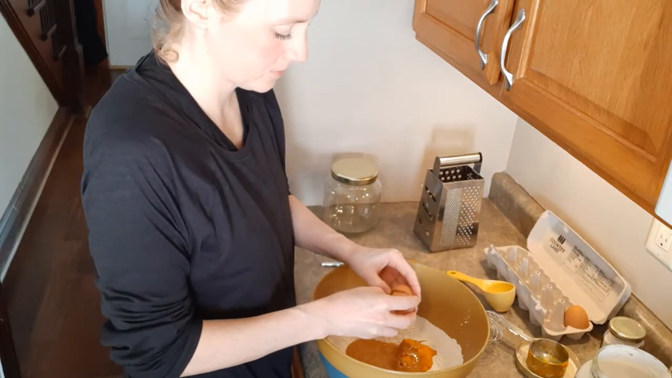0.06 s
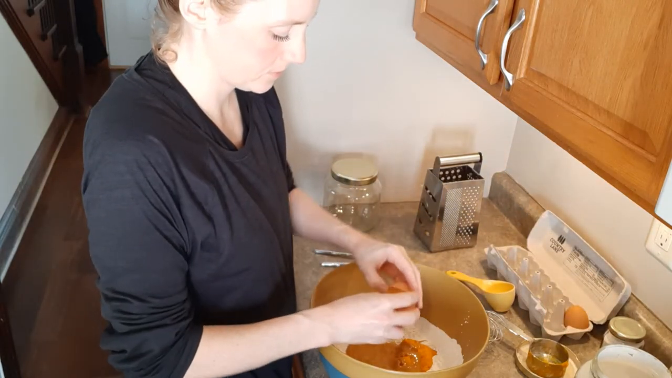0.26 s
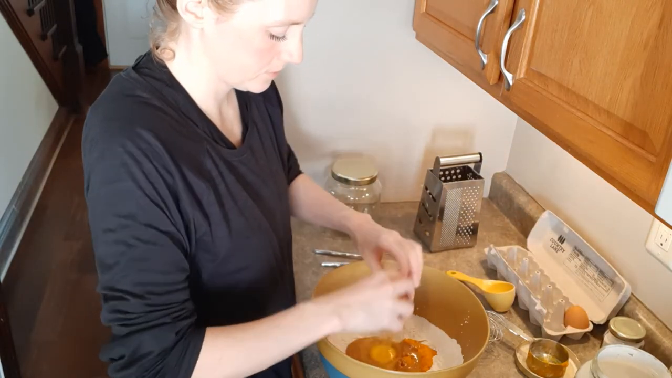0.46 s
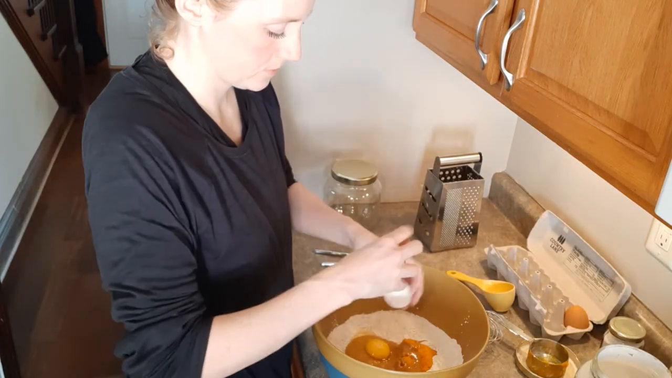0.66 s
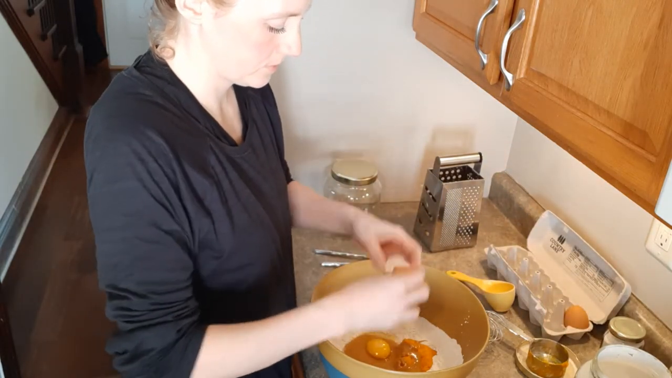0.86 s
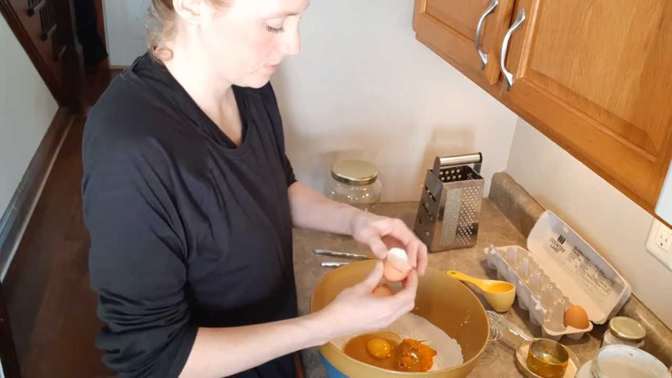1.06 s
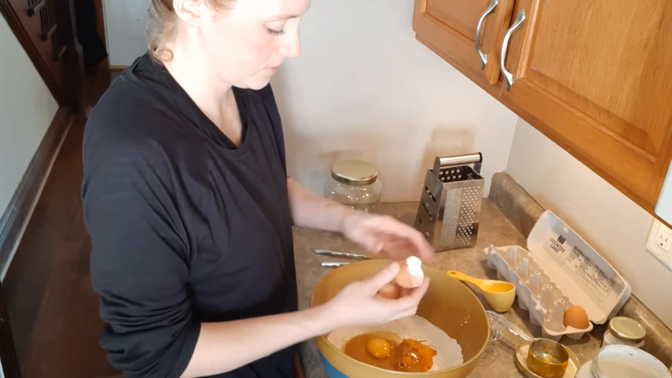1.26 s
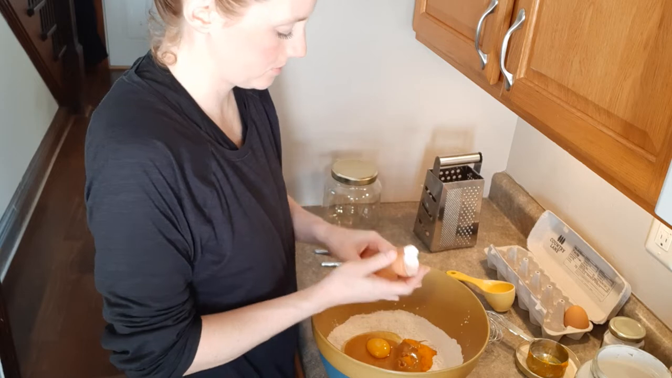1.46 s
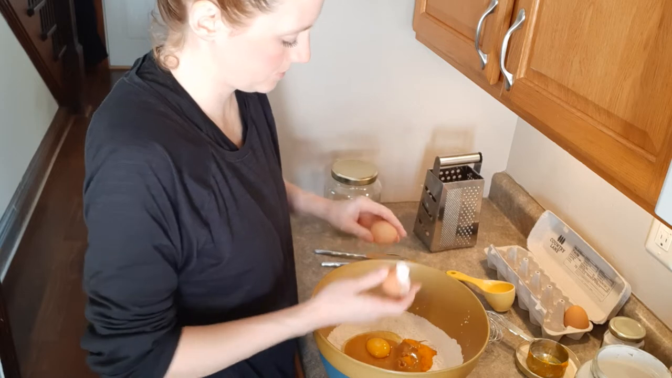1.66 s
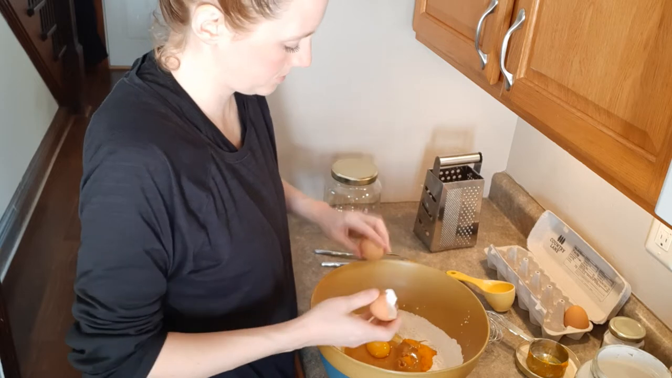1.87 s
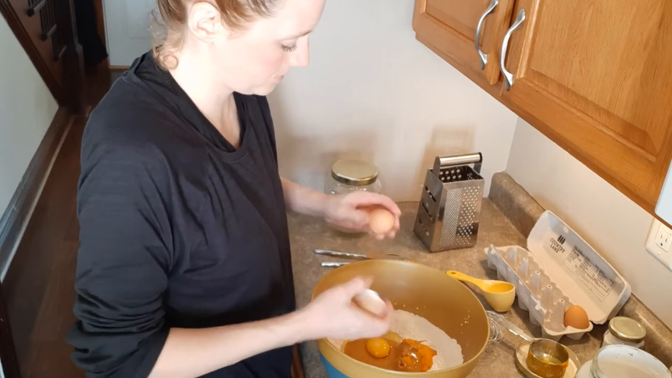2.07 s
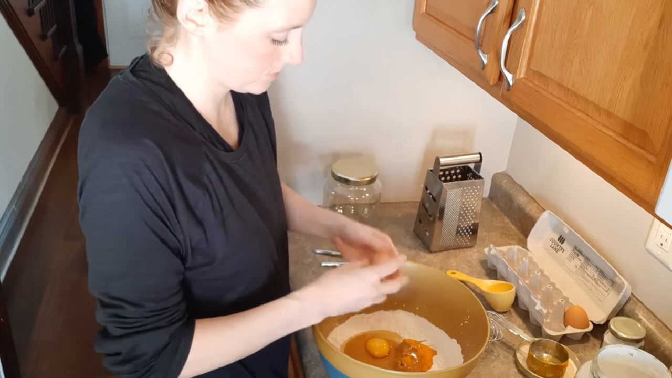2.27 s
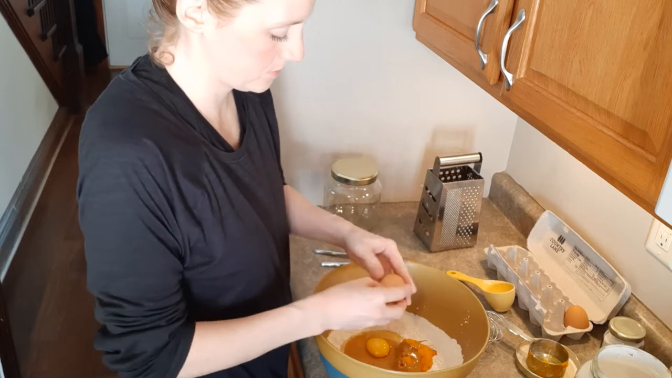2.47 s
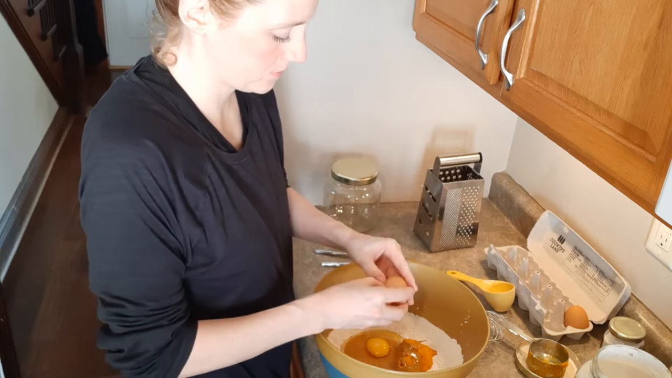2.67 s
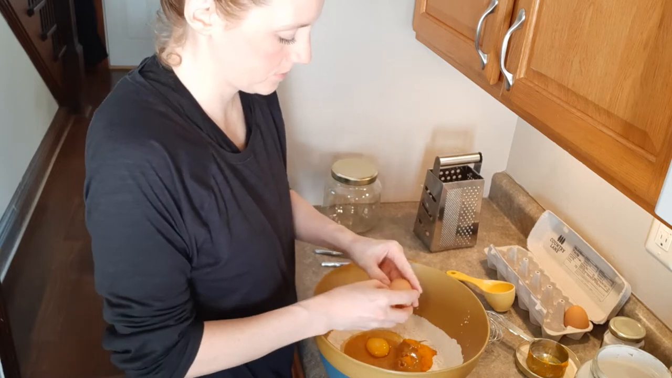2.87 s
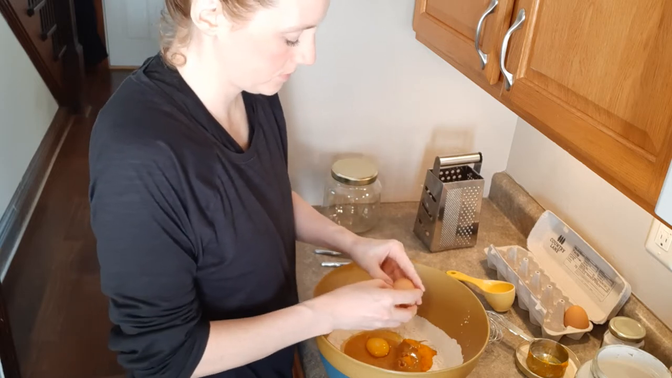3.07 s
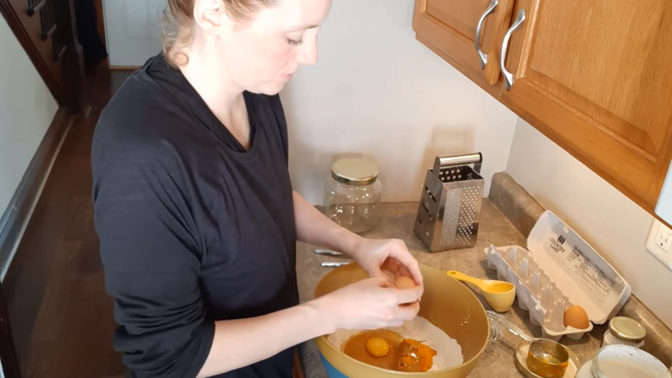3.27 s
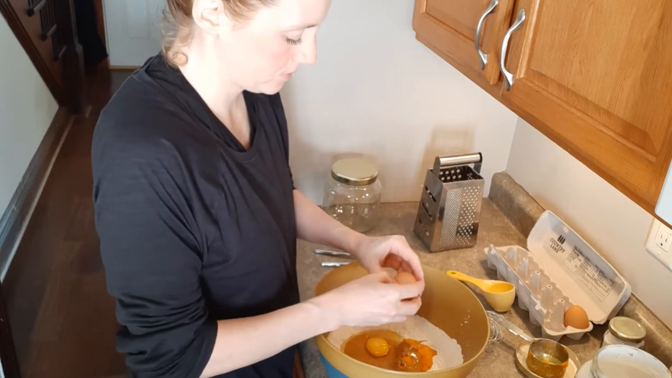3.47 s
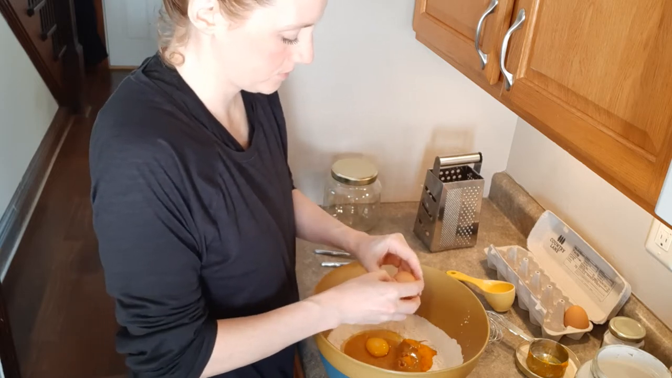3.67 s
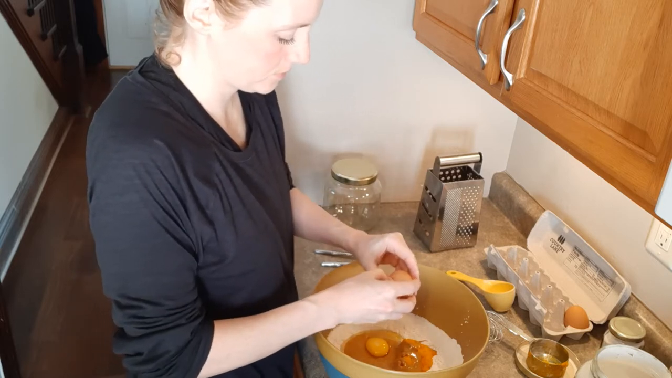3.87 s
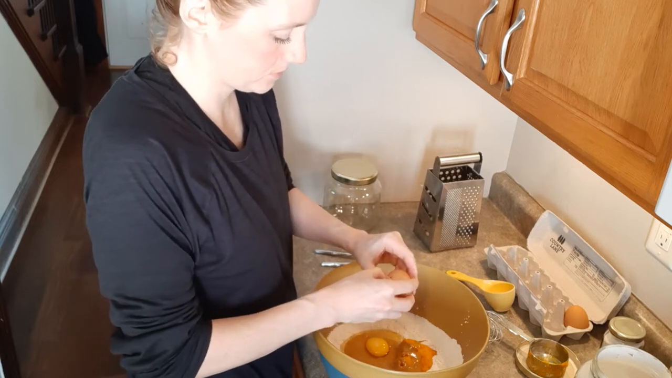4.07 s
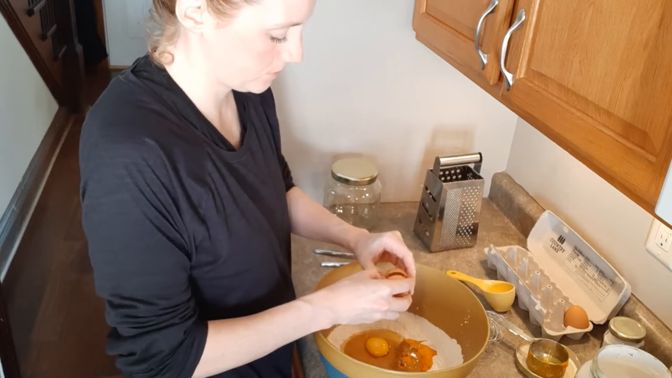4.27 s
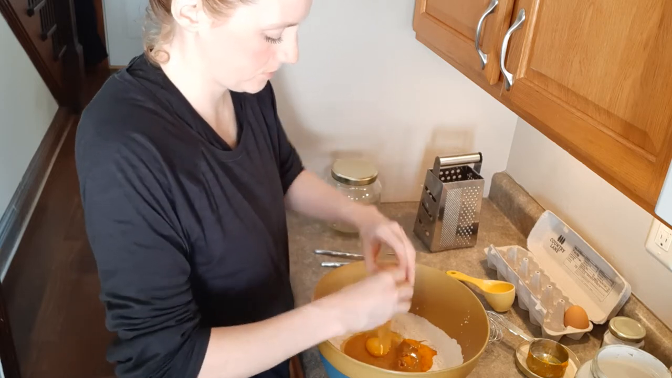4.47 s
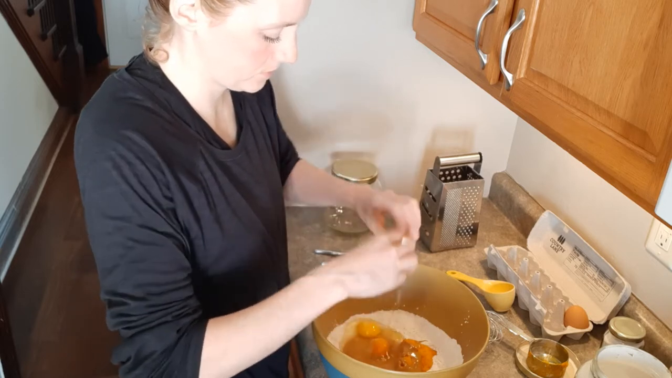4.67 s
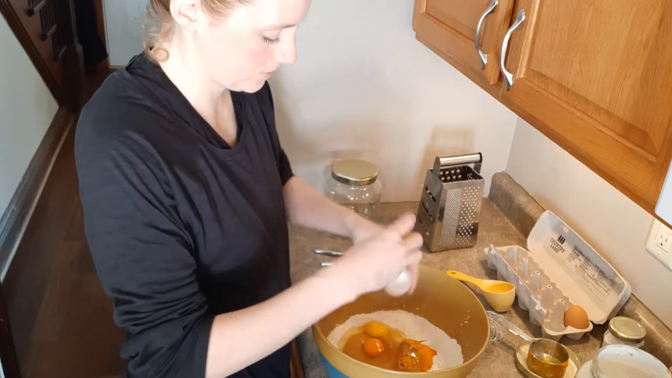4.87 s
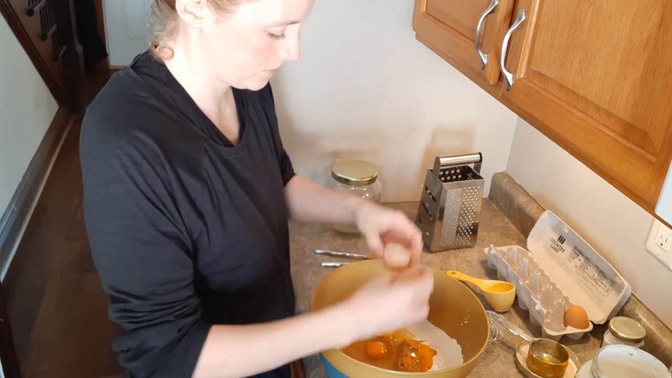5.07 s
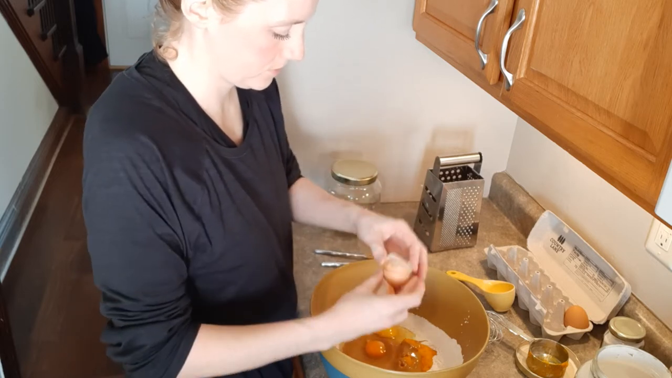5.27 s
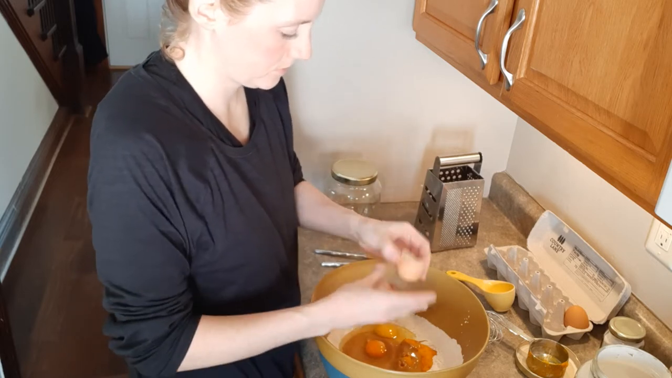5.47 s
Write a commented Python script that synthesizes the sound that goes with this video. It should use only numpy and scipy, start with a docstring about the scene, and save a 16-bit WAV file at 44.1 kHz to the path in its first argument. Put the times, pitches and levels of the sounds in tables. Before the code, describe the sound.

Stereo pickup near a mixing bowl on a counter: light dry shell ticks and a small crunch, one sharp, dominant knock on the rim with short bowl resonance and a dull boom. Quiet picking clicks continue until the shell splits with wet hollow pops, then halves are pressed together in a bright crackle. Short lively room reflections, low steady appliance rumble with faint hiss behind.

```python
"""Eggshells crack and crush over a mixing bowl: runs of tiny filtered clicks, brighter or duller piece by piece.
Thumbs pull one shell apart; the next egg is knocked on the rim, pried open and emptied, its halves pushed together.
Air pockets in the wet shell pop as short ringing tones, and the draining white crackles.
The bowl rings in decaying modes and the counter thuds with low booms and a noise bump.
A small hard room answers, over shaped fan noise and wavering motor tones from an appliance."""
import sys
import numpy as np
from scipy import signal
from scipy.fft import rfft, irfft
from scipy.io import wavfile

SR = 44100
rng = np.random.default_rng(int(sys.argv[2]) if len(sys.argv) > 2 else 0)


def unload_wav(signal):
    """Save mono or channel-first audio to the path in sys.argv[1] as 16-bit WAV at rate SR, clipped to [-1, 1]."""
    wavfile.write(
        sys.argv[1],
        SR,
        np.round(np.clip(np.atleast_2d(signal).T, -1, 1) * 32767).astype(np.int16),
    )


N = 243431  # samples

# Single shell cracks: (t/s, level/dB, length of the run/s, lowest f of the flexing piece/Hz, treble/dB)
SHELL_CRACKS = [(.037, -44.5, 0.0051, 4470, -20), (.082, -29, 0.0076, 3330, -3.5),
                (0.197, -42.5, .0012, 4000, 3), (0.4231, -24.5, .0012, 3260, 14),
                (0.4252, -31.5, .003, 3340, -11), (1.9191, -9, 0.0061, 840, 1.5),
                (2.633, -44, 0.014, 2600, 4), (2.673, -38, 0.0042, 2580, -6),
                (2.92, -31.5, 0.0025, 4200, -4), (2.9624, -24.5, .008, 1960, 2),
                (3.0917, -28, 0.0036, 1640, 1.5), (3.7182, -28.5, 0.0046, 3640, 2),
                (4.222, -19.5, 0.0064, 1010, 16), (4.227, -14, 0.0017, 3120, 1.5),
                (4.426, -42, 0.0079, 1130, -3), (4.537, -49, 0.0064, 3960, -12),
                (4.57, -43.5, 0.014, 4700, -22), (4.675, -30.5, 0.0013, 9600, 26.5),
                (5.236, -35, 0.0091, 2500, 1), (5.2861, -22.5, 0.0063, 2000, 21)]
SNAPS_PER_S, SNAP_SPREAD_DB, FIRST_SNAP_DB = 1900, 5.5, 15  # jerks of a running crack


def cracks():
    """A crack runs through the shell as a rapid train of snaps, led by a strong one."""
    out = np.zeros(N)
    for s, db, length, low_hz, treble_db in SHELL_CRACKS:
        run = snaps(length, SNAPS_PER_S, SNAP_SPREAD_DB, FIRST_SNAP_DB)
        add(out, s, at_level(piece(run, low_hz, treble_db), db))
    return out


# Shell being crushed: (t/s, level/dB, swell/s, die-away/s, lowest f/Hz, starting treble/dB,
# ring level of the hollow/dB, first pitch f of the hollow/Hz)
SHELL_CRUSHES = [(0.261, -38.5, .002, 0.039, 1270, 7, -39.5, 2370),
                 (.776, -39, .002, 0.025, 2100, 9, -51.5, 2720),
                 (1.071, -17.5, 0.04, .017, 1810, 12.5, -25, 2240),
                 (1.927, -17.5, 0.0043, 0.049, 780, -5, -33, 1420),
                 (4.235, -30, .002, 0.071, 1190, -3.5, -39, 1690),
                 (5.051, -36.5, .001, 0.034, 1190, 5, -32.5, 2230),
                 (5.292, -19, 0.0077, 0.03, 1700, 20, -29.5, 2670)]
CRUSH_JERKS_PER_S, CRUSH_SPREAD_DB = 1200, 6  # density of snaps and how much their sizes differ
DULLING_DB_PER_S = 125.5  # a crush loses treble as egg white wets the pieces
HOLLOW_SINK, HOLLOW_SINK_S = 0.43, 0.093  # fall of the hollow's pitch (log units) and its time constant


def crush_snaps():
    """Squeezed shell breaks in a swelling and fading crowd of snaps that grows duller."""
    out, t = np.zeros(N), np.arange(SR // 4) / SR
    for s, db, swell, die_away, low_hz, treble_db, _, _ in SHELL_CRUSHES:
        squeeze = pressure(t, swell, die_away, start=0.22)
        run = jerks(t, CRUSH_JERKS_PER_S, CRUSH_SPREAD_DB) * squeeze
        treble_over_time = treble_db - DULLING_DB_PER_S * t
        add(out, s, at_level(piece(run, low_hz, treble_over_time), db))
    return out


def crushed_hollows():
    """The air in a crushed half rings on at a sinking pitch."""
    out, t = np.zeros(N), np.arange(SR // 4) / SR
    for s, _, swell, die_away, _, _, db, first_hz in SHELL_CRUSHES:
        squeeze = pressure(t, swell, 1.6 * die_away, start=0.56)
        run = jerks(t, per_s=900, spread_db=2.5) * squeeze
        hz = first_hz * np.exp(-HOLLOW_SINK * (1 - np.exp(-t / HOLLOW_SINK_S)))
        add(out, s, at_level(pocket(run, hz, cycles=45, scatter=0.12), db))
    return out


# Air pockets popping in the wet shell: (t/s, level/dB, f/Hz, time it keeps being shaken/s)
AIR_POPS = [(.082, -34, 4100, .0023), (.262, -32.5, 1400, 0.0018), (.262, -38, 2110, .004),
            (.263, -39.5, 3740, 0.0063), (.423, -30.5, 3700, 0.00096), (0.517, -35.5, 2050, 0.012),
            (3.719, -43, 2140, 0.0076), (4.224, -24, 1234, 0.015), (4.226, -21.5, 3255, 0.0025),
            (4.227, -20, 4500, 0.0088), (4.573, -39, 6220, 0.0066), (4.644, -43.5, 3140, 0.034),
            (4.702, -40, 2740, 0.0058), (5.053, -35.5, 3160, .045), (5.16, -45.5, 3440, 0.0062),
            (5.2867, -27.5, 2494, 0.0068), (5.2866, -29, 3420, 0.0043), (5.32, -31.5, 5870, 0.01),
            (5.322, -30, 1940, 0.013), (5.344, -31, 1480, 0.015), (5.345, -30.5, 3740, 0.0053),
            (5.398, -36, 2170, 0.014)]
POP_TICK_DB, POP_TICK_TREBLE_DB = -11, -21  # bursting film: level against its pop, and its treble
POP_CYCLES, POP_LEAK = 44, 0.33  # cycles to -60 dB at 2 kHz; smaller pockets leak more and ring fewer


def film_ticks():
    """The film over each air pocket bursts with a single dull tick."""
    out = np.zeros(N)
    for s, db, hz, _ in AIR_POPS:
        tick = signal.unit_impulse(SR // 4)
        add(out, s, at_level(piece(tick, hz, POP_TICK_TREBLE_DB), db + POP_TICK_DB))
    return out


def pops():
    """A small pocket of air is shaken into a short, slightly scattered ring."""
    out = np.zeros(N)
    for s, db, hz, length in AIR_POPS:
        run = snaps(length, per_s=870, spread_db=7.0, first_db=18)
        cycles = POP_CYCLES * (2000 / hz) ** POP_LEAK
        add(out, s, at_level(pocket(run, hz, cycles, scatter=1.57 / cycles), db))
    return out


# Fingers sliding over a shell: (t/s, level/dB, length/s)
FINGER_RUBS = [(0, -49, 0.023), (1.395, -45.5, 0.1), (2.373, -51, 0.098), (3.39, -49, 0.058),
               (4.182, -48.5, .02), (4.982, -50.5, 0.066)]
RUB_LOW_HZ, RUB_TREBLE_DB = 1730, -4.5


def rubs():
    """Sliding fingers catch and slip in a dense, fine patter with a soft start."""
    out = np.zeros(N)
    for s, db, length in FINGER_RUBS:
        run = snaps(length, per_s=3900, spread_db=5.0, first_db=-14)
        add(out, s, at_level(piece(run, RUB_LOW_HZ, RUB_TREBLE_DB), db))
    return out


# Tone colour of shell snaps: (f/Hz, level/dB)
SHELL_COLOUR = [(700, -3), (1500, 7), (2100, 2), (3000, -4.5), (4200, -1), (5500, -1), (7500, -3),
                (11000, -4.5), (16000, -5.5)]


def shell():
    """Cracks, crushes, film ticks and rubs all take on the colour of thin shell."""
    return colour(cracks() + crush_snaps() + film_ticks() + rubs(), SHELL_COLOUR)[0]


DRAIN_START_S, DRAIN_DIE_AWAY_S, DRAIN_DB, DRAIN_HZ, STRANDS_PER_S = 4.33, 0.08, -44.5, 2100, 59


def draining():
    """The opened egg drains and strands of white part with a fine wet crackle."""
    out, t = np.zeros(N), np.arange(SR // 4) / SR
    strands = jerks(t, STRANDS_PER_S, spread_db=7.0) * np.exp(-t / DRAIN_DIE_AWAY_S)
    add(out, DRAIN_START_S, at_level(pocket(strands, DRAIN_HZ, cycles=10, scatter=.35), DRAIN_DB))
    return out


def hollows():
    """Small wet cavities radiate pops, hollow rings and drips of crackle, with little bass."""
    wet = pops() + crushed_hollows() + draining()
    return signal.sosfilt(signal.butter(2, 750, "high", fs=SR, output="sos"), wet)


# The egg meets the rim and sinks onto it: (t/s, level/dB, contact time/s)
RIM_KNOCKS = [(1.9189, -1.5, 0.0009), (1.943, 6, 0.00049), (1.961, -37.5, 0.0014)]
# Ringing modes of the bowl: (f/Hz, relative level/dB, time to fall 60 dB/s)
BOWL_MODES = [(251, -25.5, 0.2), (426, -32.5, 0.13), (841.7, -30, .34), (1389, -25, .33),
              (1540, -32.5, 0.19), (1714, -29, 0.11), (2057.7, -20.5, 0.28), (2380, -32, 0.13),
              (2844, -38, 0.28), (3752, -39.5, .33), (4640, -34, .29), (4720, -38, .27), (5010, -40.5, .31),
              (5766, -36.5, .3), (6270, -30, .22), (7300, -28, .22), (7000, -31.5, 0.2)]


def bowl():
    """Each push on the rim feeds the ringing of every mode; a longer contact softens the high ones."""
    out, t = np.zeros(N), np.arange(SR) / SR
    first = RIM_KNOCKS[0][0]
    for hz, mode_db, t60 in BOWL_MODES:
        swing = 0
        for s, db, contact in RIM_KNOCKS:
            age = t - (s - first)
            softness = 1 / np.sqrt(1 + (hz * contact / 2) ** 2)
            fading = from_db(db + mode_db - 60 * np.abs(age) / t60)
            swing = swing + softness * (age >= 0) * fading
        add(out, first, swing * np.sin(2 * np.pi * hz * t))
    return out


# Bowl rocking on the counter: (t/s, level/dB, f/Hz, time to fall 60 dB/s)
COUNTER_THUDS = [(1.936, -24.5, 170, 0.21), (1.94, -25.5, 106.6, 0.63), (1.94, -22.5, 79, 0.43),
                 (1.946, -19, 57.4, 0.67), (2.015, -20.5, 62.5, 0.14)]


def counter():
    """The heavy bowl rocks and the worktop booms in a few low modes."""
    out, t = np.zeros(N), np.arange(SR) / SR
    for s, db, hz, t60 in COUNTER_THUDS:
        add(out, s, from_db(db) * ring(hz, t60, t) * (1 - np.exp(-t / 0.00084)))
    # the worktop's many higher modes blur into a dull bump
    mid_band = signal.butter(2, [170, 900], "band", fs=SR, output="sos")
    bump = signal.sosfilt(mid_band, rng.standard_normal(len(t)))
    bump = bump * from_db(-60 * t / 0.32) * (1 - np.exp(-t / 0.019))
    add(out, RIM_KNOCKS[0][0] + .007, at_level(bump, db=-16.5))
    return out


# Room decay: (f/Hz, time to fall 60 dB/s)
ROOM_DECAY = [(100, 0.7), (700, 0.43), (2000, 0.38), (5000, 0.35), (8000, 0.26), (14000, 0.28)]
# Tone colour of the room tail: (f/Hz, relative level/dB)
ROOM_TONE = [(100, -8), (700, -4.5), (2000, 0.5), (5000, 1), (8000, 4), (15000, -1)]


def kitchen():
    """Stereo echo pattern: sparse early echoes and a dense tail that dies sooner in the treble."""
    t = np.arange(int(.7 * SR)) / SR
    hz = np.fft.rfftfreq(len(t), 1 / SR)
    white, tail = rfft(rng.standard_normal((2, len(t)))), 0
    edges = np.geomspace(40, SR / 2, num=19)
    for low, high in zip(edges, edges[1:]):
        centre = np.sqrt(low * high)
        band = irfft(white * ((hz >= low) & (hz < high)), len(t))
        fall_db = -60 * t / at_hz(ROOM_DECAY, centre)
        tail = tail + band * from_db(at_hz(ROOM_TONE, centre) + fall_db)
    tail = unit(tail * (1 - np.exp(-t / 0.00028)))
    hits = rng.random((2, len(t))) < 2500 / SR
    near = rng.standard_normal((2, len(t))) * hits * np.exp(-t / 0.0026) * (t > .0007)
    return unit(tail + 0.83 * unit(near))


def heard(x, echoes, room_db, left_db):
    """The direct sound reaches the right port two samples early; the room follows."""
    direct = np.array([from_db(left_db) * np.roll(x, 2), x])
    return direct + from_db(room_db) * signal.fftconvolve(x[None], echoes, axes=1)[:, :N]


# Fan rumble and hiss: (f/Hz, relative level/dB per Hz)
FAN_SPECTRUM = [(15, -59.5), (25, -50.5), (48, -2.5), (217, -10.5), (249, -5), (354, -13), (384, -16.5),
                (416, -11), (516, -17.5), (840, -23), (962, -25), (1560, -31), (1790, -43), (7510, -50),
                (16000, -39)]
# Likeness of the fan noise on both sides: (f/Hz, left-right correlation)
FAN_LIKENESS = [(60, 1), (130, 0.85), (250, 0.92), (500, .55), (1000, 0.05), (3000, 0.059), (15000, 0.1)]
FAN_DB = -43  # rms


def fan():
    """Steady air noise, alike on both sides in the bass and wide in the treble."""
    hz = np.fft.rfftfreq(N, 1 / SR)
    alike = np.clip(at_hz(FAN_LIKENESS, hz), 0, 1)
    mid, side = rfft(rng.standard_normal((2, N))) * from_db(at_hz(FAN_SPECTRUM, hz))
    spectrum = np.sqrt(1 + alike) * mid + np.sqrt(1 - alike) * side * [[1], [-1]]
    return from_db(FAN_DB) * unit(irfft(spectrum, N)) * np.sqrt(N)


# Appliance motor tones: (f/Hz, relative rms level/dB)
MOTOR_TONES = [(59.2, -50.5), (118.4, -60.5), (166.9, -55), (247.6, -51.5), (296.1, -55), (355.3, -62.5),
               (414.5, -62.5), (506.0, -63)]


def motor(hum_db, waver):
    """Each motor tone wavers slowly in level and phase, the same on both sides."""
    t = np.arange(N) / SR
    hum, knots = 0, np.linspace(0, t[-1], num=40)
    for tone_hz, db in MOTOR_TONES:
        swell, sway = [np.interp(t, knots, waver * rng.standard_normal(len(knots))) for _ in range(2)]
        phase = 2 * np.pi * (tone_hz * t + rng.random()) + sway
        hum = hum + np.sqrt(2) * from_db(db) * (1 + swell) * np.sin(phase)
    return from_db(hum_db) * hum


def jerks(t, per_s, spread_db):
    """Brittle breakage as random clicks of uneven size and either sign."""
    sizes = from_db(spread_db * np.minimum(rng.exponential(1, len(t)), 3))
    sizes = sizes * rng.choice([-1, 1], len(t))
    return sizes * (rng.random(len(t)) < per_s / SR)


def snaps(length, per_s, spread_db, first_db):
    """A run of jerks: one snap at the start, then uneven ones until it stops."""
    t = np.arange(SR // 5) / SR
    run = jerks(t, per_s, spread_db) / (1 + (t / length) ** 8)
    run[0] = from_db(first_db)
    return run


LURCH_DB, LURCH_S = 2, .009  # typical size and spacing of the uneven lurches


def pressure(t, swell, die_away, start):
    """The squeeze on a shell builds up, then eases, in lurches as the shell gives way."""
    steps = rng.standard_normal(len(t))
    lurch = from_db(LURCH_DB * np.interp(t / LURCH_S, np.arange(len(t)), steps))
    build_up = np.minimum(start + (1 - start) * t / swell, 1)
    return lurch * build_up * np.exp(-np.maximum(t - swell, 0) / die_away)


BODY_DB = -14.5  # the whole egg against the flexing piece


def piece(run, low_hz, treble_db):
    """Small pieces radiate mostly treble, the whole egg a little body; wet pieces snap more dully."""
    flex = signal.sosfilt(signal.butter(3, low_hz, "high", fs=SR, output="sos"), run)
    body = signal.sosfilt(signal.butter(3, low_hz, fs=SR, output="sos"), run)
    run = flex + from_db(BODY_DB) * body
    dull = signal.sosfilt(signal.butter(2, 7000, fs=SR, output="sos"), run)
    bright = signal.sosfilt(signal.butter(2, 7000, "high", fs=SR, output="sos"), run)
    return dull - from_db(treble_db) * bright  # minus keeps the two bands in phase at the crossover


def pocket(run, hz, cycles, scatter):
    """Each jerk sets the enclosed air ringing; the gap shifts, so each has its own pitch."""
    out, t = np.zeros(SR // 2), np.arange(SR // 16) / SR
    # the opening jerk keeps the exact pitch
    pitches = hz * np.exp(scatter * rng.normal(size=len(run)) * (np.arange(len(run)) > 0))
    for i in np.flatnonzero(run):
        add(out, i / SR, run[i] * ring(pitches[i], cycles / pitches[i], t))
    return out


def ring(hz, t60, t):
    """A struck mode: a sine that falls 60 dB in t60 seconds."""
    return np.sin(2 * np.pi * hz * t) * from_db(-60 * t / t60)


def from_db(db):
    """Decibels to gain."""
    return 10 ** (np.asarray(db) / 20)


def unit(x):
    """Scale to an energy of one."""
    return x / np.sqrt(np.sum(x ** 2, axis=-1, keepdims=True) + 1e-20)


def at_level(sound, db):
    """Give a short sound the energy of 4 ms at this rms level."""
    return unit(sound) * from_db(db) * np.sqrt(.004 * SR)


def at_hz(points, hz):
    """Read a table on a log-frequency axis."""
    f, value = np.transpose(points)
    return np.interp(np.log(np.maximum(hz, 1)), np.log(f), value)


def colour(x, points):
    """Causal (minimum-phase) filter with the given (f/Hz, level/dB) response."""
    size = 2 ** 13
    cepstrum = irfft(np.log(from_db(at_hz(points, np.fft.rfftfreq(size, 1 / SR)))))
    # folding the cepstrum forward makes the response minimum-phase
    cepstrum[1:size // 2] *= 2
    cepstrum[size // 2 + 1:] = 0
    response = irfft(np.exp(rfft(cepstrum)))
    return signal.fftconvolve(np.atleast_2d(x), response[None], axes=1)[:, :N]


def add(track, s, sound):
    """Mix a sound in at time s (seconds)."""
    start = max(round(s * SR), 0)
    track[start:start + len(sound)] += sound[:max(N - start, 0)]


def scene():
    """Shell, hollows, bowl and counter in the kitchen, over the appliance."""
    echoes = kitchen()
    crackle = heard(shell(), echoes, room_db=5.0, left_db=-3.3)
    wet_pops = heard(hollows(), echoes, room_db=4.0, left_db=-2.5)
    clang = heard(bowl(), echoes, room_db=-1.5, left_db=-5.5)
    thud = heard(counter(), echoes, room_db=-18.5, left_db=0.0)
    return crackle + wet_pops + clang + thud + fan() + motor(hum_db=0.5, waver=0.35)


# Response of both microphone ports: (f/Hz, level/dB)
PORT_RESPONSE = [(20, -8.5), (38, -16), (52, -1.5), (7000, 3), (7800, 3), (8250, -17.5), (8650, -30.5),
                 (9200, -11), (10300, -4), (11500, 3), (15500, 3.5), (18000, -28.5)]
# Left port against the right one: (f/Hz, level/dB)
LEFT_TILT = [(500, -.3), (2000, .5), (5500, 0), (8000, -2), (15000, -2.8)]
CUTOFF_HZ = 15900


def record(dry):
    """The ports have a deep treble notch, the left one is duller; peaks are rounded, the top is cut."""
    left, right = colour(dry, PORT_RESPONSE)
    ports = np.array([colour(left, LEFT_TILT)[0], right])
    rounded = ports / (1 + (ports / .65) ** 6) ** (1 / 6)
    return signal.sosfilt(signal.ellip(12, .2, 90, CUTOFF_HZ, fs=SR, output="sos"), rounded)


dry = scene()
out = record(dry)
unload_wav(out)
```